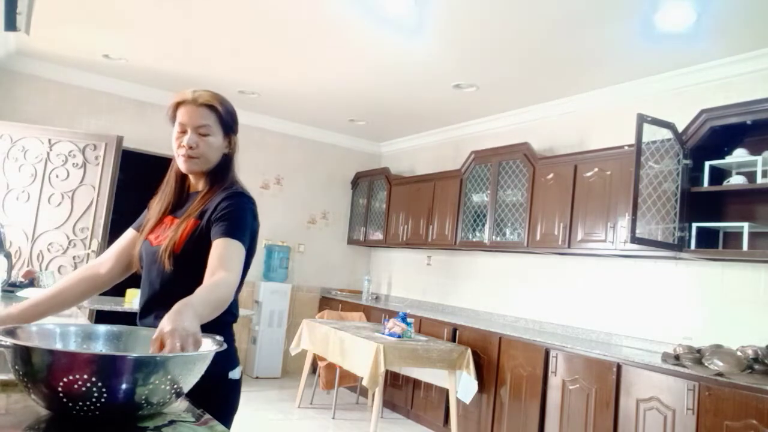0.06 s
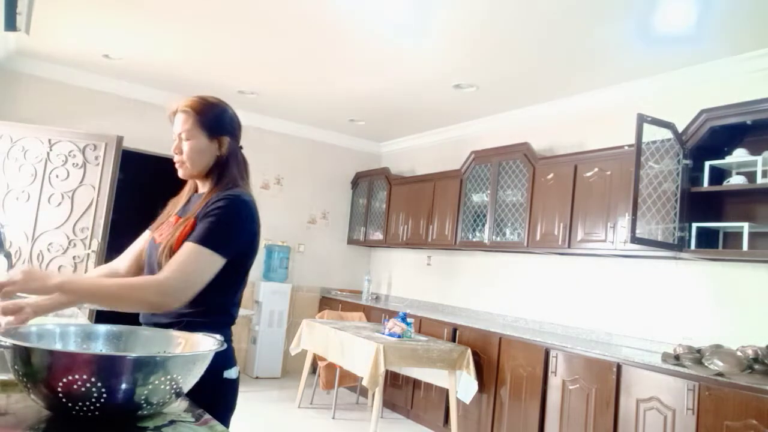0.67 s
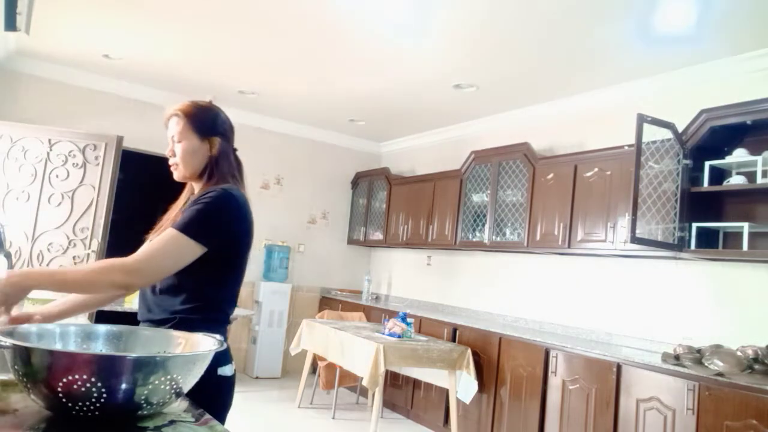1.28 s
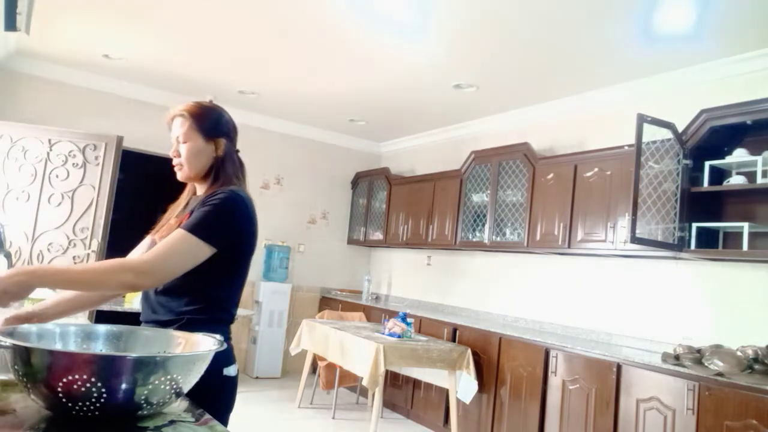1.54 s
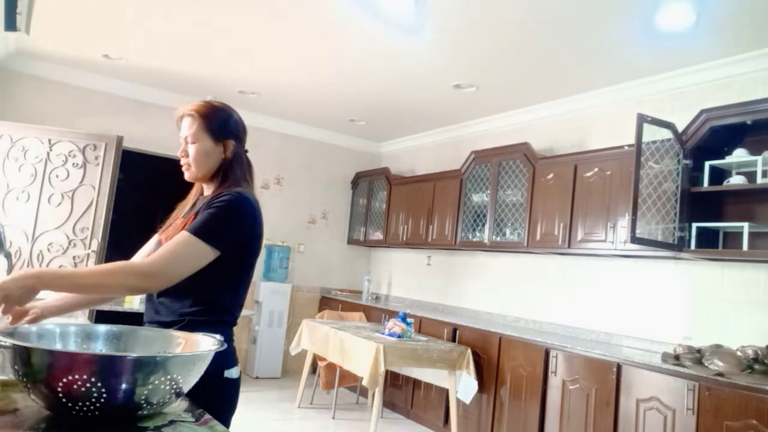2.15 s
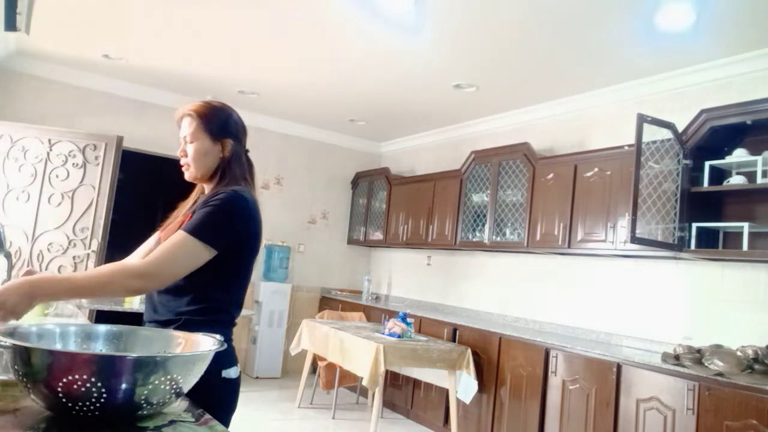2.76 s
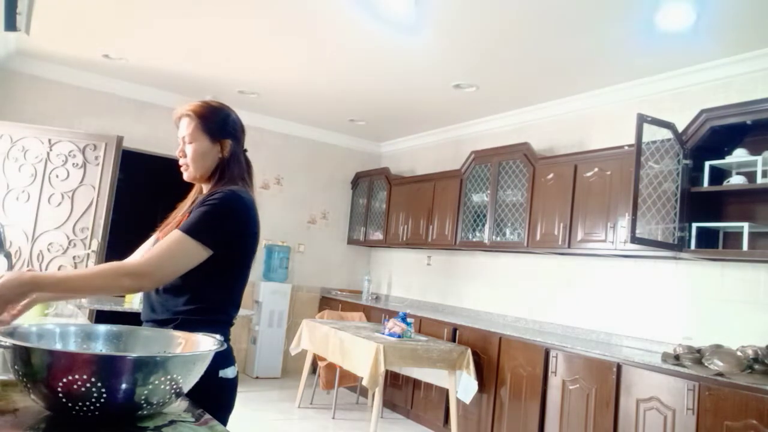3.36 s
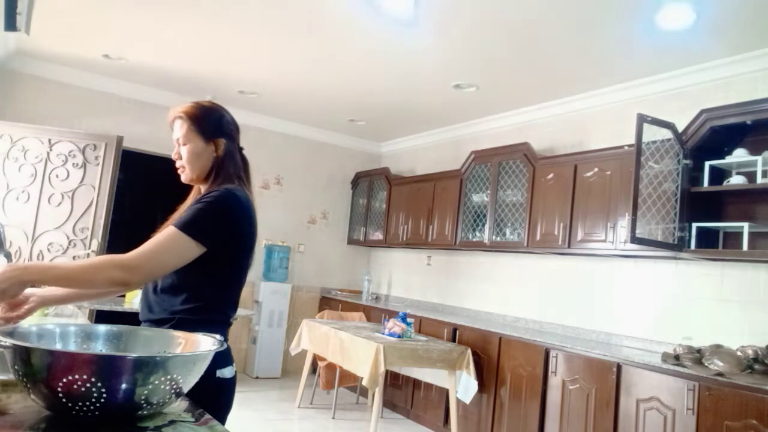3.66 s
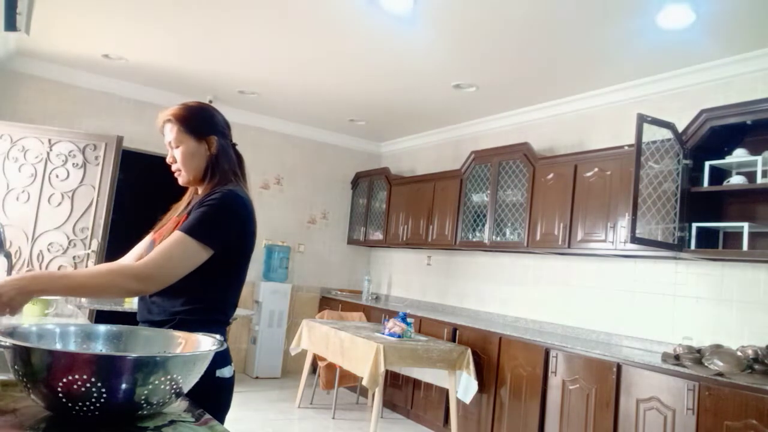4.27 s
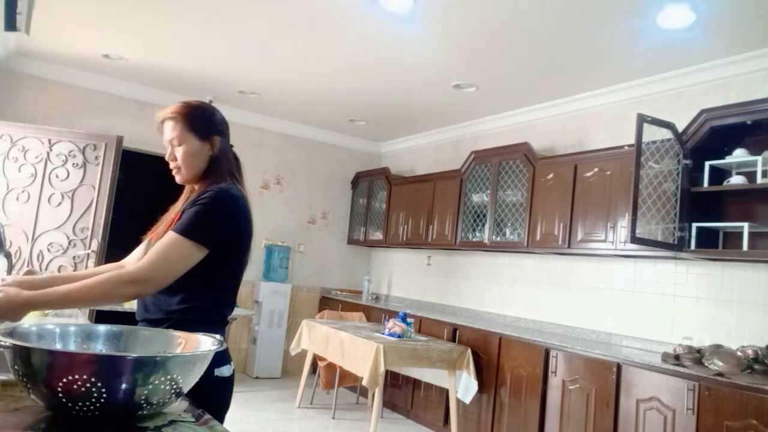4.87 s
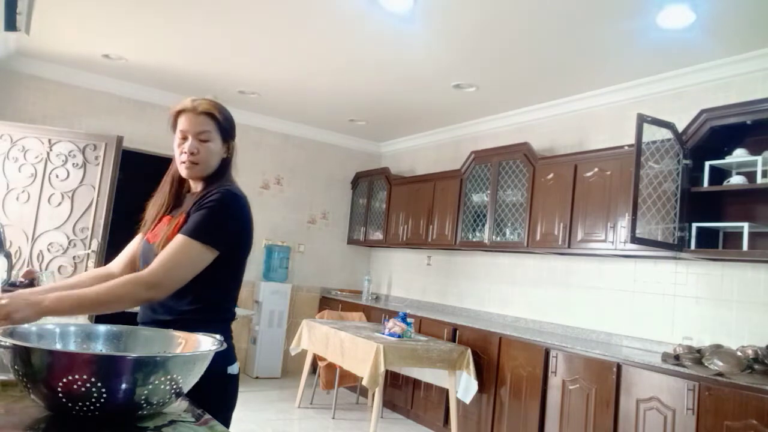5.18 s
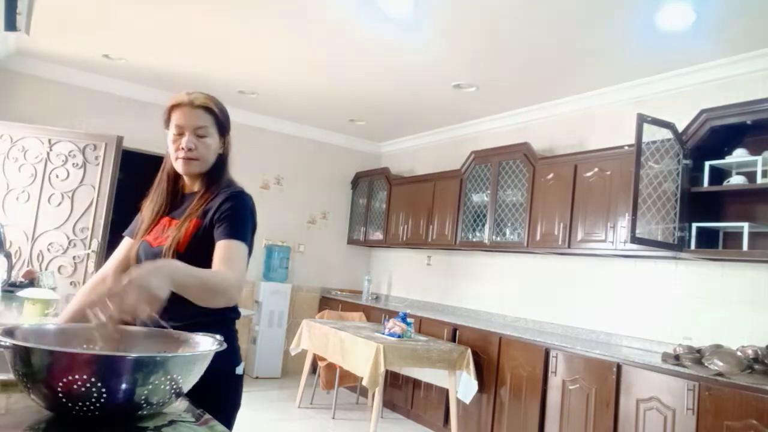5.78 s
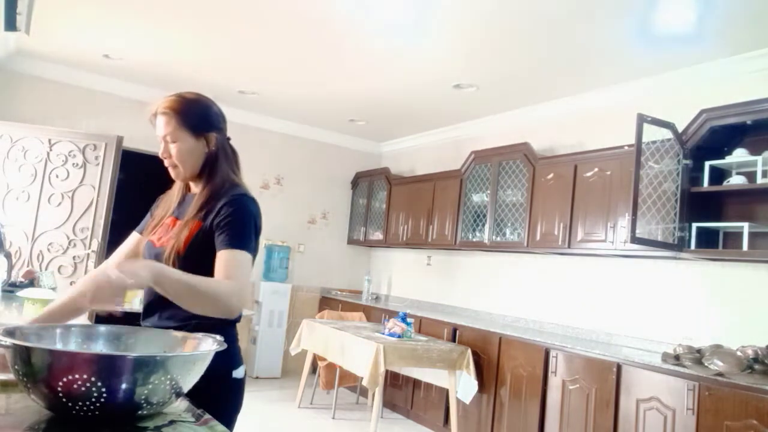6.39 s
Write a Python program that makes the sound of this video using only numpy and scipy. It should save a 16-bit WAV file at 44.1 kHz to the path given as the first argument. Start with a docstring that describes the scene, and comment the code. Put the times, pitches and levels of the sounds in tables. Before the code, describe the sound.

Dishes are washed by hand under a running tap, clattering into a steel colander in an echoing kitchen with a low hum.

```python
"""Dishes clatter and ring as they drop into a steel colander close by: washing up in a large tiled kitchen.
A tap runs throughout, splashing on the crockery and drumming on the steel sink. Wet dishes knock and
scrape, water glugs, and the stream glances off in spurts. Near the end a lid, a bowl and cutlery
land in the colander too. An appliance hums low underneath, and the hard walls echo every blow."""
import sys
import numpy as np
from scipy import signal
from scipy.fft import rfft, irfft, next_fast_len
from scipy.io import wavfile

SR = 44100
rng = np.random.default_rng(int(sys.argv[2]) if len(sys.argv) > 2 else 0)


def bounce(signal):
    """Save signal as a 16-bit WAV file at the path given by the first command-line argument."""
    frames = np.transpose(np.atleast_2d(signal))
    limited = np.clip(frames, -1, 1)
    pcm = np.round(limited * 32767).astype(np.int16)
    wavfile.write(sys.argv[1], SR, pcm)


N = 293132
TIME = np.arange(N) / SR
BLOW = np.arange(SR) / SR  # seconds after a blow
HANDS_IN_S, HANDS_OUT_S = 0.92, 5.85  # when the hands enter and leave the stream


def gain_of(db):
    """Turns decibels into a number to multiply by."""
    return 10 ** (np.asarray(db) / 20)


def evened(x):
    """Scales a sound to an average (rms) level of 1."""
    return x / np.sqrt(np.mean(x ** 2) + 1e-20)


def sized(x, db):
    """Gives a blow the energy of a twentieth of a second at this level."""
    return gain_of(db) * x * np.sqrt(SR / 20 / (np.sum(x ** 2) + 1e-20))


def read(points, hz):
    """Reads between the rows of a table, spacing frequencies by octaves."""
    row_hz, value = np.transpose(points)
    return np.interp(np.log(hz + 1), np.log(row_hz + 1), value)


def add(mix, start_s, sound):
    """Lays a sound into the mix; it may have begun before time zero."""
    start = round(start_s * SR)
    sound = sound[max(-start, 0):]
    part = mix[max(start, 0):][:len(sound)]
    part += sound[:len(part)]


def coloured(x, points, treble_db=0):
    """Shapes a sound's tone by a table of Hz and dB, with extra treble above 5 kHz."""
    size = next_fast_len(len(x))
    hz = abs(np.fft.fftfreq(size, 1 / SR))
    shelf = hz ** 4 / (hz ** 4 + 5000. ** 4)
    log_gain = np.log(gain_of(read(points, hz) + treble_db * shelf))
    response = np.exp(np.conj(signal.hilbert(log_gain)))[:size // 2 + 1]  # nothing sounds before its hit
    return irfft(rfft(x, size) * response, size)[:len(x)]


def resonate(x, hz, width_hz):
    """Makes a sound ring around one pitch; the narrower the width, the longer it rings."""
    pole = np.exp((2j * np.pi * hz - np.pi * width_hz) / SR)
    return signal.lfilter([1, -1], np.poly([pole, pole]), x).real


def ring(modes, scatter=0., count=1):
    """A struck thing's own tones die away, each as `count` copies scattered in pitch."""
    t, out = BLOW[:SR * 3 // 4], np.zeros(SR)
    for hz, db, fade_s in modes:
        pitches = hz * (1 + scatter * rng.uniform(-0.91, 1, (count, 1)))
        waves = np.cos((2 * np.pi * pitches * t).astype(np.float32))
        fade = np.exp(-np.log(1000) * t / fade_s) / np.sqrt(fade_s)  # same energy, long or short
        out[:len(t)] += gain_of(db) * fade * (rng.choice([-1, 1], count) @ waves)
    return out


def contact(length_s):
    """A fading burst of noise, like the tiny slips when two hard rims meet."""
    return rng.standard_normal(SR) * np.exp(-BLOW / max(length_s, 1e-4))


def kitchen(x, direct_db, early=0.77):
    """The direct sound, quick echoes off counter and wall, then a tail; every spot has its own echoes."""
    # How long the room echoes. Each row: frequency in Hz, seconds to fade by 60 dB.
    echo_times = [(100, 0.79), (400, 0.37), (1000, 0.67), (2500, 0.82), (4000, 0.79), (8000, 0.62),
                  (15000, 0.47)]
    hz, t, spectrum = signal.stft(rng.standard_normal(SR), SR, nperseg=256)
    fade = np.exp(-np.log(1000) * t / read(echo_times, hz)[:, None])
    tail = signal.istft(spectrum * fade, SR, nperseg=256)[1][:SR]
    echo = tail * (1 + early * np.exp(-BLOW / .01))
    echo /= np.linalg.norm(echo)
    echo[0] = gain_of(direct_db)
    return signal.fftconvolve(x, echo / np.linalg.norm(echo))[:len(x)]


def clatter(thing, crack_db, thud_db, ring_db):
    """A thing lands: its rim cracks, the counter thuds, it rings and jangles against its neighbours."""
    # The tones of each thing, and of the counter.
    # Each row: pitch in Hz, share of the energy in dB, seconds to fade by 60 dB.
    thing_tones = { "dish": [(1147, 3, 0.13), (1757, -3.5, 0.14), (3750, 1, 0.19), (4650, -4.5, 0.43),
                   (4705, -1.5, .5), (5570, -5, 0.14), (5640, -2.5, 0.71), (8000, -2.5, 0.33),
                   (7560, -17, 0.26), (10030, -8.5, 0.33), (9700, -12, 0.67), (12440, -22, .3),
                   (14125, -11, .25)], "bowl": [(669, 2, 0.32), (980, -3.5, 0.4), (1770, -2.5, 0.063),
                   (4635, -8, 0.31), (5530, -7.5, .2), (7830, -10, 0.23), (9900, -5, 0.17),
                   (10070, 0, 0.14), (14450, -12, .15)], "cup": [(3190, -8, 0.082), (3770, 1, 0.033),
                   (3604, 2, 0.086), (5540, -4, 0.22), (6710, -4, 0.099), (8600, -3, 0.2),
                   (12300, -17, .15)], "lid": [(1420, 1.5, 0.13), (1683, 3, 0.24), (3950, 2.5, 0.44),
                   (5610, 7, 0.14), (5800, -2, .2), (8850, -8, 0.62), (10000, -32, 0.13), (13600, -21, .2),
                   (14440, -10, 0.22)], "spoon": [(3990, 3.5, .85), (4630, -10, .2), (5690, -5, 0.18),
                   (7500, -33, .3), (8135, -29, .4), (8700, -15, .4), (8900, -18, .45), (10350, -11, 0.16),
                   (14250, -21, 0.22)], "fork": [(3990, -3, .8), (9400, -13.5, 0.28), (10300, -25, .12)]}
    counter_tones = [(261, -0.5, 0.11), (323, -5, 0.075), (405, 8, 0.1), (538.5, 2, 0.39), (710, -16, 0.4),
                     (815, -37, 0.3), (939, -3.5, 0.15)]
    # The tone of a hard hit. Each row: frequency in Hz, boost or cut in dB.
    crack_colour = [(40, -41), (200, -14.5), (400, 3.5), (1200, 3.5), (2300, 3.5), (3700, 4.5),
                    (4200, -5.5), (4700, -3), (5150, -12.5), (7200, -9), (9300, -15), (10300, -15.5),
                    (11500, -30), (13000, -29), (15000, -18.5)]
    # Harder things crack brighter. For each thing: extra treble in dB.
    hardness_db = {"dish": 3.5, "bowl": 0.5, "cup": 7, "lid": 7.5, "spoon": 22, "fork": 6}
    # How each thing lies. Each row: direct ring against its echo in dB, change to its jangle in dB.
    lying = {"dish": (-2, 0), "bowl": (-2, -2), "cup": (-2, -2), "lid": (-2, -2), "spoon": (7, -8),
             "fork": (5, -8)}
    direct_db, jangle_db = lying[thing]
    onset = 1 - np.exp(-BLOW / .002)
    crack = sized(coloured(contact(0.0029) * onset, crack_colour, hardness_db[thing]), crack_db + .5)
    thud = sized(ring(counter_tones), thud_db - 3)
    thud += sized(resonate(contact(0.0025), 480, width_hz=600), thud_db - 9)
    thud = signal.sosfilt(signal.butter(4, 230, "high", fs=SR, output="sos"), thud)
    tone = sized(ring(thing_tones[thing]), ring_db - 5.5)
    jangle = ring(thing_tones[thing], scatter=.012, count=5) * np.exp(-BLOW / .045) * onset
    hit = crack + thud + sized(jangle, ring_db + jangle_db)
    return kitchen(hit, direct_db=-7.5) + kitchen(tone, direct_db) + boom(thud_db)


def boom(thud_db):
    """The wooden cupboard under the counter booms briefly when something heavy lands."""
    # Its panels. Each row: pitch in Hz, level in dB at a heavy thud, dB gained per dB of thud.
    panels = [(273.5, -21, 2.5), (96, -26, 2.5)]
    heavy_thud_db = -13
    push = contact(0.0012)
    wood = sum(sized(resonate(push, hz, width_hz=91), db + growth * (thud_db - heavy_thud_db))
               for hz, db, growth in panels)
    return kitchen(wood, direct_db=-0.5)


def drops(per_s, spread_db):
    """Drops land at random, many small and a few large."""
    size = gain_of(spread_db * np.minimum(rng.exponential(1, N), 4))
    return size * rng.standard_normal(N) * (rng.random(N) < per_s / SR)


def flutter(depth_db, step_s):
    """The hands keep breaking up the stream, so its loudness wavers at random."""
    moments = np.arange(0, TIME[-1], step_s)
    return gain_of(depth_db * np.interp(TIME, moments, rng.standard_normal(len(moments))))


def bubbles(per_s, low_hz, high_hz, cycles, count=16):
    """Trapped air rings for some cycles, rising a little in pitch."""
    out = np.zeros(N)
    for hz in np.geomspace(low_hz, high_hz, count):
        age = np.arange(0, 5, hz / cycles / SR)
        plink = np.exp(-age) * np.sin(2 * np.pi * cycles * age * (1 + 0.01 * age))
        out += signal.oaconvolve(drops(per_s / count, spread_db=5.5), plink)[:N]
    return evened(out)


def water():
    """Drops patter on the dishes, throw off a fine spray, drum on the basin and trap bubbles."""
    # How squarely the stream hits a dish. Each row: time in seconds, splash level in dB.
    splash_levels = [(0, -46), (.9, -45), (1.1, -41), (1.35, -40.5), (1.72, -43.5), (2.15, -37.5),
                     (2.53, -45), (2.7, -42), (3.35, -39), (3.7, -46), (3.85, -44.5), (4.35, -36.5),
                     (5.05, -43), (5.7, -43.5), (6.0, -45)]
    # The fine spray. Each row: time in seconds, level in dB at the usual splash.
    spray_levels = [(0, -45), (.85, -51), (1.25, -43.5), (2.2, -53.5), (3.3, -44), (4.35, -47), (5.1, -49),
                    (5.6, -41.5), (6.0, -62)]
    # The tone of the splash, and of the spray. Each row: frequency in Hz, boost or cut in dB.
    splash_colour = [(200, -16), (550, 9), (1050, -3), (1300, 1), (2200, -1), (3300, 2), (3950, 1),
                     (4500, -7), (5300, -13.5), (7150, 3.5), (8500, -8), (11000, -21), (15000, -4.5)]
    spray_colour = [(2000, -41), (5000, 4.5), (7000, 24), (9000, 14.5), (12000, 12), (14500, 15.5),
                    (16000, -50)]
    # The steel basin's tones. Each row: pitch in Hz, width in Hz, level in dB at the usual splash.
    basin_tones = [(234.5, 32, -53.5), (284.8, 28, -47.5), (337, 60, -48), (399.7, 38, -53),
                   (526, 100, -57), (757, 180, -50), (951, 62, -55), (1051, 53, -53)]
    usual_splash_db, reach_s = -37, 0.13
    spray_follows, drum_follows = 0.66, 0.12  # dB per dB of splash
    splash_db = np.interp(TIME, *np.transpose(splash_levels))
    excess_db = splash_db - usual_splash_db
    spray_db = np.interp(TIME, *np.transpose(spray_levels)) + spray_follows * excess_db
    hands_away = np.clip(np.maximum(HANDS_IN_S - TIME, TIME - HANDS_OUT_S) / reach_s + .5, 0, 1)
    drum_db = drum_follows * excess_db - hands_away  # 1 dB softer with the hands away
    breakup = flutter(depth_db=1.8, step_s=.055)
    drum_gain = gain_of(drum_db) * flutter(depth_db=2, step_s=.08)
    large_drops = drops(per_s=900, spread_db=3.8) * flutter(depth_db=1.8, step_s=.06)
    fine_drops = drops(per_s=1300, spread_db=4) * flutter(depth_db=3.2, step_s=.05)
    splash = evened(coloured(large_drops, splash_colour))
    plinks = bubbles(per_s=90, low_hz=2700, high_hz=3900, cycles=3) * gain_of(-9)
    spray = evened(coloured(fine_drops, spray_colour)) * gain_of(spray_db) * breakup
    patter = drops(per_s=300, spread_db=2.0)
    drum = sum(gain_of(db) * evened(resonate(patter, hz, width)) for hz, width, db in basin_tones)
    gurgle = bubbles(per_s=30, low_hz=290, high_hz=440, cycles=7) * gain_of(-49)
    sink = (splash + plinks) * gain_of(splash_db) * breakup + (drum + gurgle) * drum_gain
    return kitchen(sink, direct_db=-6) + kitchen(spray, direct_db=-8.5)


def hum():
    """A low, throbbing appliance hum over the rumble of the room."""
    # The appliance's tones. Each row: pitch in Hz, width in Hz, level in dB.
    hum_tones = [(97.2, 6.3, -46), (113.1, 6.8, -46), (132.1, 12.7, -43.5)]
    # The tone of the rumble. Each row: frequency in Hz, boost or cut in dB.
    rumble_colour = [(20, -42), (40, -31), (55, -1), (85, -6.5), (140, 7), (175, -0.5), (260, -8.5),
                     (600, -4), (1100, -7.5), (1600, -30)]
    drone = sum(gain_of(db) * evened(resonate(rng.standard_normal(N + SR), hz, width)[SR:])
                for hz, width, db in hum_tones)
    return drone + gain_of(-47) * evened(coloured(rng.standard_normal(N), rumble_colour))


def knock_or_glug(strength_db, length_s, clink_hz, hollow_hz, hollow_db):
    """A knock of wet crockery or a low glug of water: a short noise with a high and a hollow ring."""
    # The tone of a scrape muffled by the basin. Each row: frequency in Hz, boost or cut in dB.
    muffled = [(100, -21), (400, -9), (800, -21.5), (1400, -4), (2100, 2), (3700, -1), (4400, -18.5),
               (5200, -15), (7500, -15.5), (10000, -31), (15000, -75)]
    onset = 1 - np.exp(-BLOW / (0.9 * length_s))
    rub_db = -3 + np.log2(length_s / 0.0072)  # 1 dB louder each time the length doubles
    scrape = sized(coloured(contact(length_s) * onset, muffled), strength_db + rub_db)
    damping_hz = np.interp(strength_db, [-42, -30], [600, 217])  # weaker clinks die sooner
    clink = sized(resonate(contact(length_s) * onset, clink_hz, damping_hz), strength_db)
    hollow = sized(resonate(contact(length_s) * onset, hollow_hz, width_hz=0.2 * hollow_hz), hollow_db)
    return kitchen(scrape + clink + hollow, direct_db=-6, early=0.2)


def touches(per_s=2.5, length_s=0.006):
    """Lists faint knocks at random moments as the dishes are turned in the hands."""
    slots = np.arange(HANDS_IN_S, HANDS_OUT_S, 1 / per_s)
    rows = []
    for slot_s, (late, force, spot, depth) in zip(slots, rng.random((len(slots), 4))):
        force_db = 6 * (force - .5)
        clink_hz = 3160 * (1 + 0.18 * (spot - .5))
        hollow_hz = 388 * (1 + 0.27 * (depth - .5))
        rows.append((slot_s + late / per_s, force_db - 45, length_s, clink_hz, hollow_hz, force_db - 48.5))
    return rows


def spurt(db, length_s, hz):
    """The stream glances off a dish in a short shower of fine droplets."""
    shower = contact(length_s) * rng.exponential(1, SR)
    return kitchen(sized(resonate(shower, hz, width_hz=2600), db), direct_db=-4)


def scene():
    """Water and hum, with every clatter, knock, glug, spurt and touch laid over them."""
    # Things dropped in the colander. Each row: start in seconds, what lands,
    # then how strong its crack, thud and ring are in dB.
    landings = [(-.16, "dish", -24, -41, -22.5), (.065, "dish", -19, -23.5, -24.5),
                (.115, "dish", -21, -26.5, -24), (.136, "dish", -21, -40, -26.5),
                (.212, "dish", -26.5, -50, -35), (.409, "cup", -21.5, -41, -22),
                (.4495, "cup", -17.5, -14, -30), (.463, "dish", -26, -23.5, -28.5),
                (6.040, "lid", -26, -52, -20.5), (6.121, "bowl", -22, -31, -28.5),
                (6.151, "lid", -26, -19.5, -30), (6.180, "bowl", -15, -18, -18.5),
                (6.194, "lid", -23, -16, -39), (6.224, "spoon", -36, -26, -18),
                (6.238, "lid", -16, -24.5, -22), (6.256, "spoon", -21, -20, -12),
                (6.294, "spoon", -21.5, -36, -14), (6.310, "lid", -18.5, -39, -48),
                (6.347, "spoon", -40, -41, -16), (6.579, "fork", -33, -47, -26)]
    # Knocks of crockery and low hollow glugs of water in the sink. Each row: start in seconds,
    # strength in dB, length in seconds, clink pitch in Hz, hollow pitch in Hz, hollow level in dB.
    knocks_and_glugs = [(.785, -40.5, .008, 3420, 890, -64), (1.067, -38, 0.0043, 3320, 1050, -58),
                        (1.279, -38, 0.052, 3190, 340, -43), (2.415, -41.5, 0.0027, 3280, 900, -60),
                        (2.674, -27, .0068, 3740, 775, -35), (2.690, -23, 0.015, 3570, 754, -29),
                        (2.827, -31, .026, 3440, 1146, -35.5), (3.128, -28.5, 0.0052, 3750, 890, -34.5),
                        (3.410, -50, .015, 3130, 387, -39.5), (3.772, -40.5, 0.0035, 3300, 503, -45),
                        (3.830, -40, 0.0064, 3350, 330, -41), (4.000, -45, 0.0028, 3550, 607, -49),
                        (4.412, -38, 0.011, 2480, 397, -28.5), (4.482, -30.5, 0.0042, 3290, 400, -34),
                        (4.556, -27.5, 0.0077, 3600, 1303, -26), (4.589, -31, 0.01, 1740, 390, -35),
                        (4.766, -31.5, 0.018, 3720, 1790, -33.5), (4.825, -30.5, 0.0088, 2570, 328, -33.5),
                        (4.867, -31.5, 0.0054, 1780, 1330, -35), (5.114, -30, 0.0043, 3556, 1235, -40.5),
                        (5.195, -46, .0094, 3520, 362, -36.5), (5.859, -40.5, 0.0096, 3760, 545, -35)]
    # Spurts of water. Each row: start in seconds, level in dB, length in seconds, centre pitch in Hz.
    spurts = [(1.275, -34.5, 0.055, 6950), (1.355, -43, .014, 13500), (2.020, -39, 0.031, 5900),
              (2.676, -37, 0.041, 5850), (3.754, -44, .03, 13200), (4.012, -44.5, .0087, 6400)]
    mix = water() + hum()
    for table, source in [(landings, clatter), (knocks_and_glugs, knock_or_glug),
                          (spurts, spurt), (touches(), knock_or_glug)]:
        for start_s, *settings in table:
            add(mix, start_s, source(*settings))
    return mix[None]


def record(dry):
    """Rounds off the loudest peaks, then cuts the very highest treble."""
    ceiling, edge_hz = 1.1, 15520
    rounded = ceiling * np.tanh(dry / ceiling)
    treble_cut = signal.firwin(511, edge_hz, window=("kaiser", 9), fs=SR)
    return signal.oaconvolve(rounded, treble_cut[None], "same")


dry = scene()
out = record(dry)
bounce(out)
```